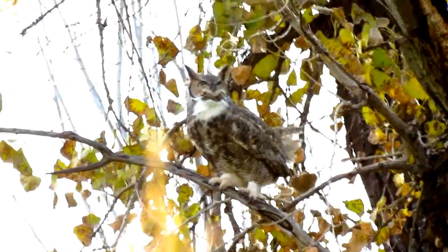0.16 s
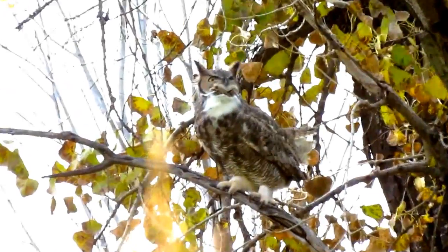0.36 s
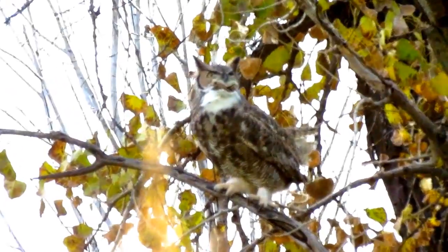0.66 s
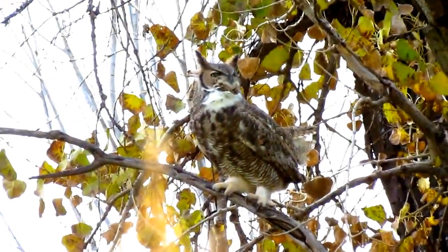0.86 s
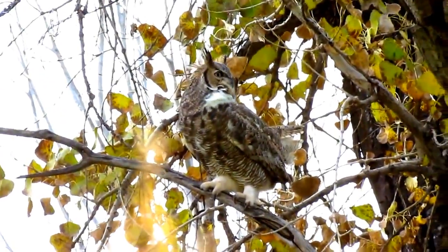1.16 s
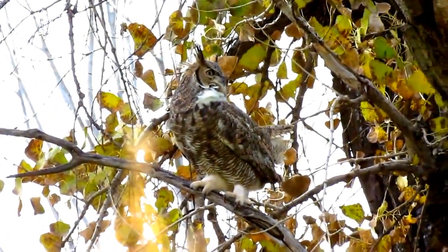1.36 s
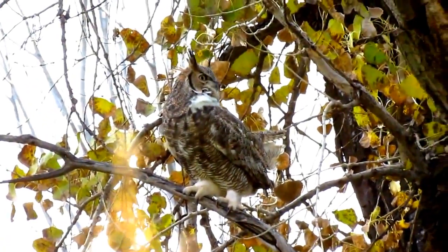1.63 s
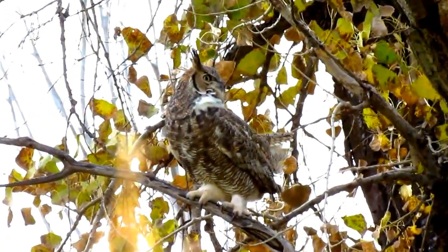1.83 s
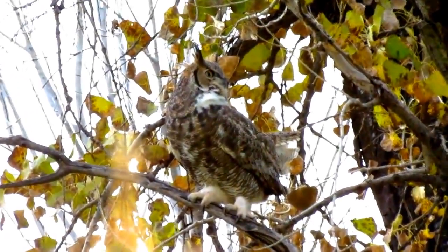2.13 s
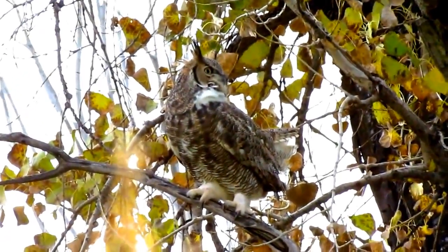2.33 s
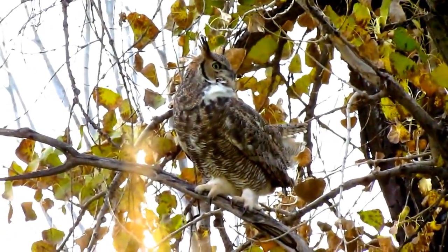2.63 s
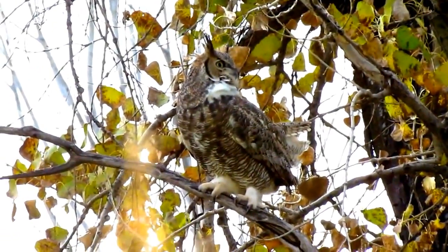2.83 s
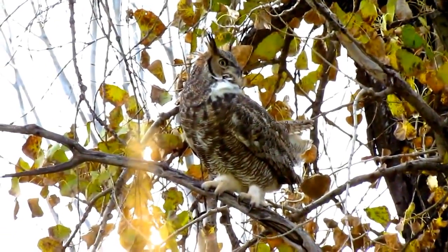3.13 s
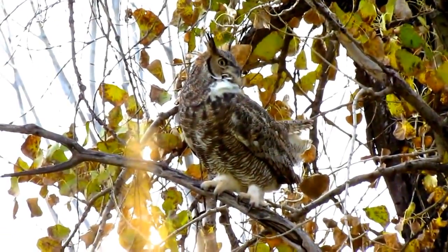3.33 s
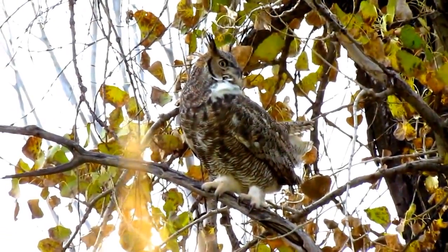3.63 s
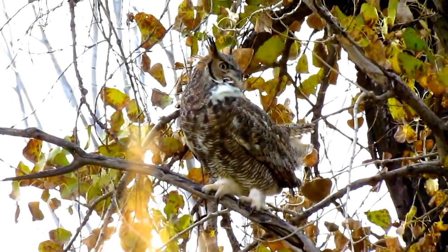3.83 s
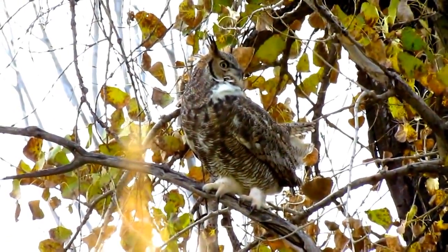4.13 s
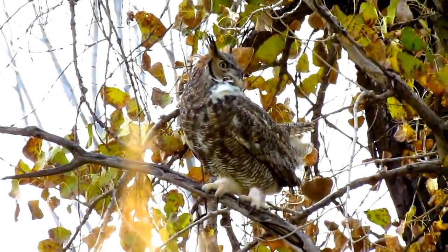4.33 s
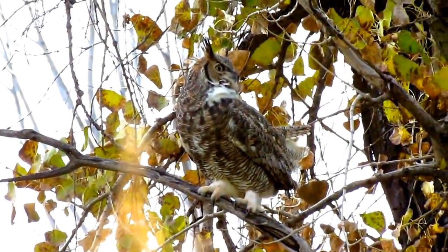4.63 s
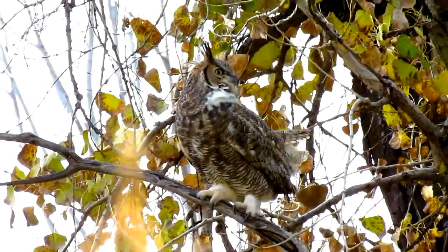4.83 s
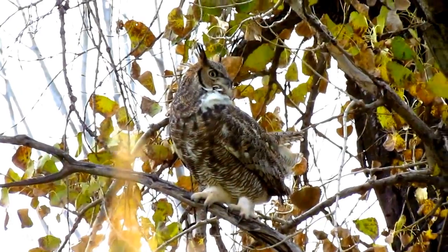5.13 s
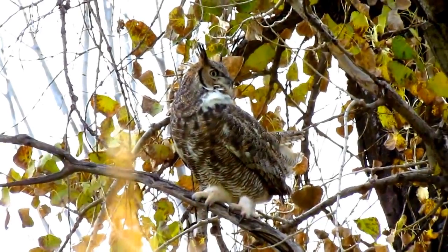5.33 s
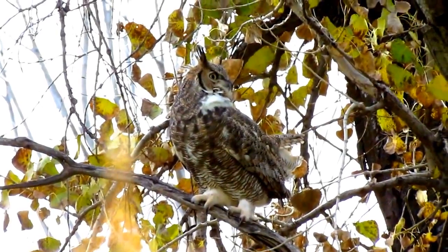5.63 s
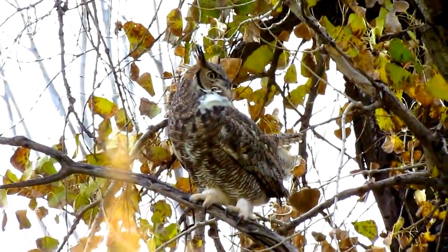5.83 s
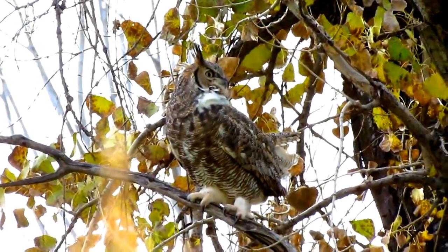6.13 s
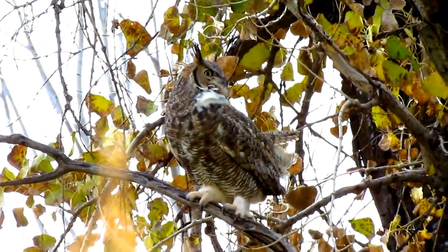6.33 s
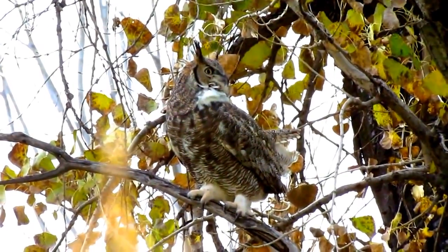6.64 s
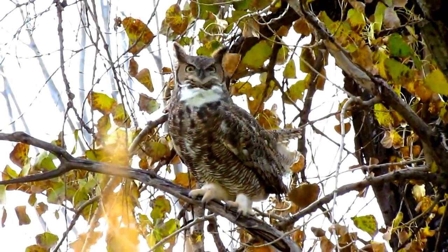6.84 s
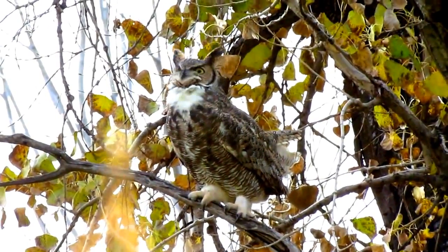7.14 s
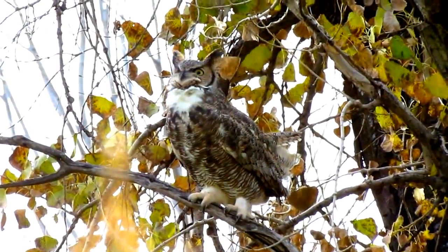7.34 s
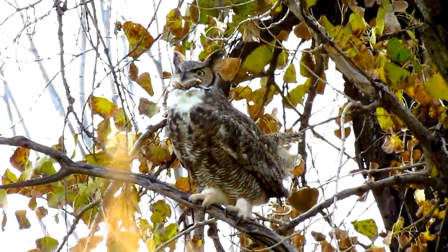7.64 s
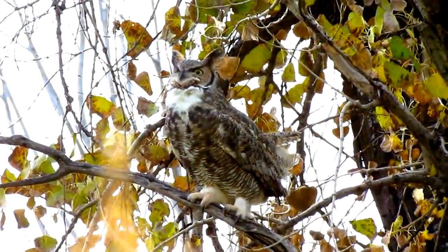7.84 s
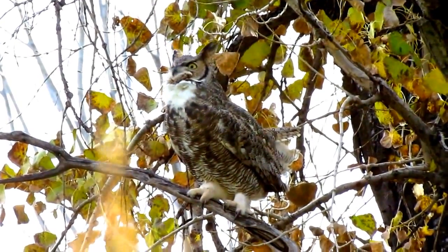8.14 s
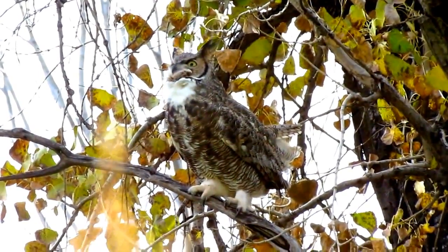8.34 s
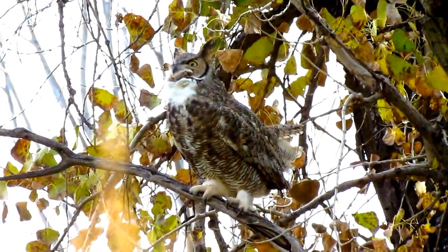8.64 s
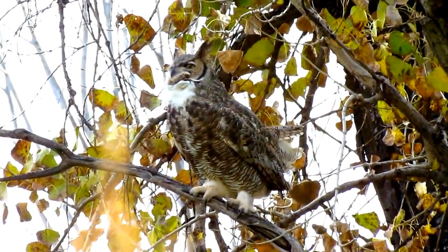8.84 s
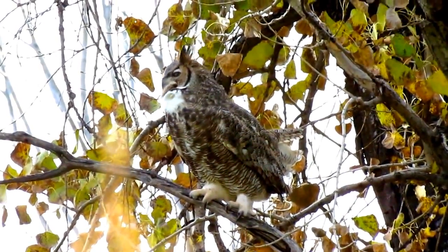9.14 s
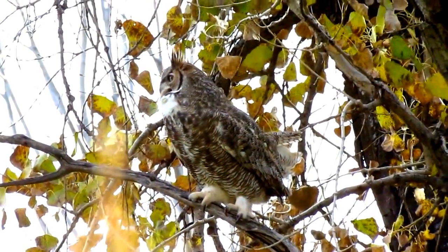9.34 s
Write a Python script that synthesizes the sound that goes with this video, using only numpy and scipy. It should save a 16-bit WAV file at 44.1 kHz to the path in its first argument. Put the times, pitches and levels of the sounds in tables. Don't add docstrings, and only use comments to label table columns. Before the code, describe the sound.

A sparrow chirps scoldingly on the left over distant traffic drone and pulsing crickets, with loud camera-handling clicks in the first two seconds.

```python
import sys
import numpy as np
from scipy import signal
from scipy.fft import rfft, irfft, next_fast_len
from scipy.io import wavfile
from scipy.ndimage import uniform_filter1d, minimum_filter1d, map_coordinates

SR = 44100
rng = np.random.default_rng(int(sys.argv[2]) if len(sys.argv) > 2 else 0)


def field_ratio(decibels):
    return 10 ** (np.asarray(decibels, dtype=float) / 20)


def master_out(mix):
    frames = np.transpose(np.atleast_2d(mix))
    ceiling = np.clip(frames, -1, 1)
    pcm = np.round(ceiling * 32767).astype(np.int16)
    wavfile.write(sys.argv[1], SR, pcm)


N = 418068
CLOCK = np.arange(N) / SR


def unit(x):
    return x / np.sqrt(np.mean(x ** 2) + 1e-20)


def along(points, hz):
    f, v = np.transpose(points)
    return np.interp(np.log(hz + 1), np.log(f + 1), v)


def curves(rows, silence_db=-120):
    s, *cols = np.transpose(rows)
    out = [np.interp(CLOCK, s, c) for c in cols]
    out[-1][(CLOCK < s[0]) | (CLOCK > s[-1] + .01)] = silence_db
    return out


def wobble(rate):
    coarse_s = CLOCK[::16]
    knots = rng.standard_normal(int(N * rate / SR) + 4)
    return np.interp(CLOCK, coarse_s, map_coordinates(knots, [coarse_s * rate]))


def hold(t, length, rise, fall):
    return np.clip(np.minimum(t / rise, (length - t) / fall), 0, 1)


def panned(x, lr_db):
    return x * field_ratio(np.array([[lr_db / 2], [-lr_db / 2]]))


def tone(hz):
    return np.sin(2 * np.pi * np.cumsum(hz) / SR)


def rush(spectrum, alike, patchy_db):
    z = signal.stft(rng.standard_normal((2, N)), nperseg=512)[2]
    field = uniform_filter1d(rng.standard_normal(z.shape[1:]), size=5, axis=0)
    field = uniform_filter1d(field, size=12, axis=1)
    pair = signal.istft(z * field_ratio(patchy_db * unit(field)), nperseg=512)[1][:, :N]
    m = next_fast_len(N + 8192)
    hz = np.fft.rfftfreq(m, 1 / SR)
    turn = np.arccos(np.clip(along(alike, hz), -1, 1)) / 2
    coloured = rfft(pair, m) * field_ratio(along(spectrum, hz)) * [np.cos(turn), np.sin(turn)]
    mid, side = irfft(coloured, m)[:, :N]
    return unit(np.array([mid + side, mid - side]))


def add(track, sound, s):
    i = round(s * SR)
    part = sound[..., max(-i, 0):max(N - i, 0)]
    track[..., max(i, 0):max(i, 0) + part.shape[-1]] += part


def among_trees(call, wet_db, lr_db, wall_db):
    # pitch_hz, time to fade by 60 dB_s
    trunk_fade = [(1500, .6), (3800, .7), (7000, .35)]
    hz, t, z = signal.stft(rng.standard_normal((2, SR // 2)), SR, nperseg=256)
    clumps_db = 4 * rng.standard_normal((2, 1, len(t)))
    fade_db = 60 * t / along(trunk_fade, hz)[:, None]
    tail = signal.istft(z * field_ratio(clumps_db - fade_db), SR, nperseg=256)[1]
    tail = tail / np.sqrt(np.sum(tail ** 2) / 2)
    delayed = np.pad(call, (SR // 200, 0))[None]
    wet = field_ratio(wet_db) * signal.fftconvolve(delayed, tail, axes=1)
    add(wet, panned(call, lr_db), 0)
    add(wet, panned(field_ratio(wall_db) * call, lr_db=10.0), .043)
    return wet


def traffic():
    # time_s, level_db
    road = [
        (0.0, -43.5),
        (1.37, -45),
        (3.64, -44),
        (4.86, -44.5),
        (7.68, -43.5),
        (8.16, -42.5),
        (9.48, -43),
    ]
    # pitch_hz, level_db per Hz
    rumble_colour = [(8.8, -33.5), (15, -4.5), (64, -1.5), (113, -4), (151, -8), (188, -7.5), (269, -10.5),
                     (292, -9.5), (400, -16), (520, -22.5), (880, -120)]
    # pitch_hz, level_db per Hz
    tyre_colour = [(150, -28), (250, -3), (400, -4.5), (500, -2.5), (790, 0.5), (1020, -.5), (1300, -8.5),
                   (1650, -16), (2500, -30.5), (4000, -78.5)]
    # pitch_hz, level_db per Hz
    leaf_colour = [(1200, -30), (1800, -4), (2500, 0), (3200, -1), (4000, -3), (5000, -5), (6300, -8),
                   (8000, -10), (10000, -12.5), (13000, -15.5), (15800, -19)]
    # pitch_hz, likeness (1 = same)
    likeness = [(60, 0.96), (130, 0.89), (290, 0.9), (640, 0.8), (1410, 0.425), (3100, 0), (6820, 0.14),
                (15000, 0)]
    # start_s, length_s, level_db
    pulls = [
        (-.1, 2.44, -49),
        (2.2, .8, -47),
        (3.75, 1.06, -51),
        (4.752, 0.93, -45),
        (5.85, 0.68, -44.5),
        (6.8, 1.22, -53),
        (8.2, 0.78, -51),
        (9, 0.77, -52),
    ]
    flow_db, = curves(road)
    flow_db = flow_db - flow_db.mean()
    rumble = panned(rush(rumble_colour, likeness, patchy_db=-0.15), lr_db=-1.3)
    rumble *= field_ratio(-43 + 0.96 * flow_db + 0.43 * wobble(4.5))
    tyres = panned(rush(tyre_colour, likeness, patchy_db=0.23), lr_db=0.7)
    tyres *= field_ratio(-42.5 + flow_db + 0.34 * wobble(6))
    leaves = panned(rush(leaf_colour, likeness, patchy_db=-0.2), lr_db=0.0)
    leaves *= field_ratio(-58.5 + 0.14 * flow_db + 0.5 * wobble(11))
    idle_db, firing_hz = -60, 73
    pull = field_ratio(idle_db)
    for s, length, db in pulls:
        pull = pull + field_ratio(db) * hold(CLOCK - s, length, rise=0.14, fall=0.19)
    engine = pull * field_ratio(.7 + 2 * wobble(4.2)) * tone(firing_hz + 1.81 * wobble(7))
    return rumble + tyres + leaves + engine


def crickets():
    # wing pitch_hz, level_db, strokes per second
    chorus = [
        (2050, -2, 35.6),
        (2090, 0, 36.2),
        (2130, -1, 36.7),
        (2185, -5, 37.3),
        (2010, -6, 47),
    ]
    out = np.zeros((2, N))
    for hz, db, rate in chorus:
        stroke = np.maximum(tone(rate + .3 * wobble(1.5)) + 1.3, 0)
        path = field_ratio(db + 3 * np.array([wobble(22), wobble(22)]))
        cycles = np.cumsum(hz + 32 * wobble(18)) / SR + rng.random((2, 1))
        out += path * stroke * np.sin(2 * np.pi * cycles)
    start_s, every_s, trill_s, edge_s = .3, .745, .46, .08
    trill = hold((CLOCK - start_s) % every_s, trill_s, edge_s, edge_s)
    trill_db, pause_db = -59, -4.6
    return field_ratio(trill_db + pause_db * (1.5 - trill)) * unit(out)


def katydid():
    # time before its end_s, level_db
    strokes = [
        (.088, -12),
        (.071, -9),
        (.054, -5),
        (.037, -3),
        (.02, -.5),
        (0, -.8),
        (-.025, -8),
    ]
    # pitch_hz, level_db per Hz
    rasp_colour = [(2500, -30), (4000, -9), (7000, -4), (10000, -3), (13000, 0), (15800, -3)]
    gate = np.zeros(N)
    t = np.arange(SR // 50) / SR
    stroke = t / .0025 * np.exp(1 - t / .0025)
    first_end_s, every_s, first_db, swell_db = 7.553, .1941, -63.5, 1.12
    for k in range(11):
        for before_s, share_db in strokes:
            db = first_db + swell_db * k + share_db + rng.normal(0, 1.2)
            add(gate, field_ratio(db) * stroke, first_end_s + every_s * k - before_s - .002)
    return gate * rush(rasp_colour, [(5000, .6)], patchy_db=1.5)


def other_birds():
    # start_s, length_s, from_hz, to_hz, level_db, left-right_db
    seeps = [
        (.757, 0.0143, 8700, 8000, -64, -4),
        (2.212, .014, 8620, 8100, -68, 8),
        (5.611, 0.049, 6400, 7500, -62, 7.5),
        (5.612, 0.0364, 5900, 6650, -60.5, 3.5),
        (6.254, .006, 5300, 4200, -60, 19.5),
        (6.462, .045, 5930, 6900, -65, 0),
    ]
    # time_s, pitch_hz, level_db
    whistle = [
        (9.0, 3230, -84),
        (9.07, 3350, -68),
        (9.2, 3620, -65.5),
        (9.27, 4000, -63),
        (9.36, 4370, -59.5),
        (9.41, 4340, -61),
        (9.48, 4050, -72),
    ]
    out = np.zeros((2, N))
    for s, length, from_hz, to_hz, db, lr_db in seeps:
        u = np.linspace(0, 1, round(length * SR))
        quiver_hz = 70 * np.interp(u, np.linspace(0, 1, num=12), rng.standard_normal(12))
        glide_hz = from_hz + (to_hz - from_hz) * np.sin(np.pi / 2 * u)
        call = np.sin(np.pi * u) ** 0.48 * tone(glide_hz + quiver_hz)
        add(out, among_trees(field_ratio(db + 5.0) * call, wet_db=-2, lr_db=lr_db, wall_db=-21.5), s)
    hz, db = curves(whistle)
    for port in out:
        hoarse = field_ratio(3 * wobble(30)) * wobble(700)
        strand = field_ratio(-5 - 90 * np.abs(CLOCK - 9.21)) * wobble(150) * tone(np.full(N, 4950.))
        port += field_ratio(db + 5.5) * (hoarse * tone(hz) + strand)
    return out


def zoom_drive():
    # start_s, length_s, spin-up_s, level_db
    runs = [
        (.14, .4, .018, -59.5),
        (1.72, .305, .11, -60.5),
    ]
    # pitch_hz, level_db per Hz
    drive_colour = [(1100, -30), (1800, -3), (4000, -2), (6000, -3), (7500, -4), (8900, -.5), (9800, -4),
                    (11300, 0), (13700, -6), (14200, -15), (15800, -22)]
    level = sum(field_ratio(db) * hold(CLOCK - s, length, rise, fall=0.022) for s, length, rise, db in runs)
    grit = field_ratio(6.0 + 0.56 * wobble(40.5) + 1.6 * wobble(250))
    return level * grit * panned(rush(drive_colour, [(5000, 0.19)], patchy_db=-1.0), lr_db=1.0)


def scrapes():
    # start_s, length_s, level_db, upper end of the noise band_hz
    slips = [
        (0.048, 0.0093, -31, 5200),
        (0.526, 0.0089, -40.5, 9000),
        (1.344, 0.011, -37.5, 9000),
        (1.385, .008, -38, 7000),
        (1.401, 0.003, -34, 5000),
    ]
    out = np.zeros((2, N))
    for s, length, db, upper_hz in slips:
        n = round(length * SR)
        edges_hz = [upper_hz * 0.26, min(upper_hz * 0.95, SR / 2.2)]
        band = signal.butter(1, edges_hz, "bandpass", fs=SR)
        swell = np.sin(np.linspace(0, np.pi, n)) ** .5
        add(out, field_ratio(db) * swell * signal.lfilter(*band, rng.standard_normal((2, n))), s)
    return out


def contacts(events, modes, gain_db, colour_db, rise_s, apart):
    out, t = np.zeros((2, N)), np.arange(SR // 12) / SR
    hz, level, t60 = np.transpose(modes)[:, :, None]
    band = np.digitize(hz, [1200, 3000, 6000])
    side = np.array([1, -1])[:, None, None]
    for s, db, lr_db, *touch in events:
        weight_db, edge_db = touch or (0, 0)
        low_db, mid_db, high_db = np.add(colour_db, [weight_db, edge_db, edge_db])
        colour = np.array([low_db, 0, mid_db, high_db])[band]
        phase = np.pi * np.arange(len(hz))[:, None] + apart * (hz / 1000) ** 0.19 * side
        fade = field_ratio(level + colour - 60 * t / t60)
        ring = np.sum(fade * np.sin(2 * np.pi * hz * t + phase), axis=1)
        noise = uniform_filter1d(rng.standard_normal((2, len(t))), size=3)
        crack = field_ratio(high_db - 12.5 - 60 * t / 0.0095) * noise
        onset = 1 - np.exp(-(t / rise_s) ** 2)
        add(out, panned(field_ratio(db + gain_db) * onset * (ring + crack), lr_db), s)
    return out


def lever_snaps():
    # time_s, peak_db, left-right_db, weight_db, edge_db
    snaps = [
        (1.9465, -8, -6, 0, 0),
        (2.0062, -24.4, -3.4, 10.1, -6.1),
    ]
    # pitch_hz, level_db, time to fade by 60 dB_s
    lever = [(577, -23.5, 0.043), (798, -25, 0.05), (1560, -2, 0.018), (2120, -17, 0.044),
             (2347, -7.5, 0.011), (3160, -21, 0.0234), (3900, -5.5, 0.013), (6150, -10, 0.0061),
             (9200, -18, 0.006), (4480, -10, .009), (5340, -12, 0.0065), (6800, -12, 0.00645),
             (10070, -19, .008), (12300, -9, 0.002)]
    return contacts(snaps, lever, gain_db=3.0, colour_db=(5.5, .5, 3), rise_s=0.00019, apart=0.61)


def catch_clack():
    # time_s, peak_db, left-right_db
    clacks = [
        (.6583, -7.5, -8),
    ]
    # pitch_hz, level_db, time to fade by 60 dB_s
    catch = [(776, -21, 0.063), (1180, -15, 0.021), (1670, -5, 0.019), (2300, -10, 0.0108),
             (2750, -13, 0.0137), (3920, -8.5, 0.014), (4364, -13, 0.011), (5540, -6, 0.0075),
             (6920, -8.5, 0.0064), (9370, -9.5, 0.0057), (12270, -12.5, 0.00665), (13560, -33.5, .006)]
    return contacts(clacks, catch, gain_db=3, colour_db=(4, -1, -2), rise_s=0.00019, apart=0.59)


def pawl_slip():
    # time_s, peak_db, left-right_db
    notch = [
        (1.4181, -17, -2),
    ]
    # pitch_hz, level_db, time to fade by 60 dB_s
    pawl = [(702, -15, 0.038), (1482, -2, 0.015), (2240, -8, 0.027), (3430, -6, 0.015), (4000, -1, 0.0081),
            (5470, -8, 0.0088), (6340, -9, 0.0053), (8840, -25, .012), (10900, -22, .012)]
    return contacts(notch, pawl, gain_db=-2.5, colour_db=(1.3, 3, 4), rise_s=0.00028, apart=0.49)


def grip_taps():
    # time_s, peak_db, left-right_db, weight_db, edge_db
    taps = [
        (0.1721, -35.9, -10.4, -1.1, 3.1),
        (0.4969, -35.5, -3.4, -2.1, -9.1),
        (0.5323, -24.6, -1.4, 0.1, 0.1),
    ]
    # pitch_hz, level_db, time to fade by 60 dB_s
    grip = [(934, -3.5, 0.053), (1520, -5, 0.03), (2020, -3.5, 0.015), (2840, -12.5, 0.016),
            (3650, -8, 0.015), (5300, -23, .008), (11500, -26, 0.0116)]
    return contacts(taps, grip, gain_db=2.0, colour_db=(1.5, 1.5, 1.65), rise_s=0.00043, apart=0.42)


def shell_bumps():
    # time_s, peak_db, left-right_db
    thuds = [
        (0.7621, -39.1, -1.4),
        (1.7121, -44.1, -1.4),
        (2.2141, -42.6, -1.4),
        (2.2281, -43.1, -1.4),
    ]
    # time_s, peak_db, left-right_db, weight_db, edge_db
    knocks = [
        (0.0229, -32.1, -2.4, 8.4, 4.1),
        (1.693, -24.1, 1.1, 0.1, 0.1),
    ]
    # pitch_hz, level_db, time to fade by 60 dB_s
    shell = [(595, -1.5, 0.075), (930, -0.5, 0.0464), (1514, 3.5, 0.02), (2001, 1.5, 0.019),
             (2830, -10, 0.017), (3570, -11, 0.0071), (5250, -17.5, 0.0149), (7600, -15, 0.0069),
             (11200, -23, 0.00565)]
    soft = contacts(thuds, shell, gain_db=5.0, colour_db=(3.2, -12, -20), rise_s=0.0045, apart=0.2)
    hard = contacts(knocks, shell, gain_db=4.5, colour_db=(-8.5, -2.5, 7.5), rise_s=0.00023, apart=0.53)
    return soft + hard


def cap_ticks():
    # time_s, peak_db, left-right_db
    ticks = [
        (1.1503, -40.1, -3.1),
        (1.7579, -51.4, 1.1),
        (1.8016, -36.1, -6.1),
        (3.4519, -41.4, 0.1),
        (3.8169, -21.6, -7.4),
        (4.161, -41.9, -4.1),
        (4.8141, -39.9, -2.1),
        (4.8408, -37.9, -4.1),
        (6.1939, -39.1, 0.6),
    ]
    # pitch_hz, level_db, time to fade by 60 dB_s
    cap = [(1470, -3.5, 0.0084), (2300, -7, 0.01), (3170, 2.5, 0.0072), (4580, -9.5, 0.0099),
           (5430, 3, 0.0032), (7670, -18, 0.0063), (12900, -34, .006)]
    return contacts(ticks, cap, gain_db=0.5, colour_db=(1.5, 1.5, 1.5), rise_s=0.0002, apart=0.89)


def sparrow():
    # start_s, level_db, top of the second partial_hz, third partial_db, length_s
    chirps = [(-.06, -55, 4000, -10, 0.075), (0.597, -53.5, 4000, -5, 0.067), (1.312, -55, 4000, -2, .08),
              (1.925, -50.5, 4070, -8.5, 0.063), (2.769, -59, 3940, -2, 0.1), (3.806, -54, 4040, -8, 0.078),
              (4.551, -54.5, 4042, -3, 0.086), (5.144, -54.5, 4030, -2.5, .08),
              (6.075, -56.5, 4000, -6.5, 0.0832), (6.847, -54.5, 4050, -4, 0.0806),
              (7.389, -54, 3646, -4, .082)]
    arch = [(0, .69), (.3, .85), (.45, .98), (.57, 1), (.7, .9), (1, .77)]
    # pitch_hz, level_db
    throat = [(1400, -11), (1900, -11.5), (2700, -9), (3700, 0), (4100, -5.5), (4500, -2.5), (5200, 2.5),
              (5700, -12.5), (6400, -5.5), (7200, -33)]
    breath_band = signal.butter(2, (3880, 7200), "bandpass", fs=SR)
    out = np.zeros((2, N))
    for s, db, top_hz, third_db, length in chirps:
        u = np.linspace(0, 1, round(length * SR))
        quiver = 1 + .02 * np.interp(u, np.linspace(0, 1, num=30), rng.standard_normal(30))
        hoarse = 1 + .45 * np.interp(u, np.linspace(0, 1, num=60), rng.standard_normal(60))
        pitch = uniform_filter1d(np.interp(u, *np.transpose(arch)), size=250) * quiver * top_hz / 2
        late = -12 * u
        partials = [(1, -.5), (2, 0.023), (3, third_db + late), (4, -.5 + 1.4 * late)]
        call = sum(field_ratio(level_db + along(throat, k * pitch)) * tone(k * pitch) for k, level_db in partials)
        scratch = signal.lfilter(*breath_band, rng.standard_normal(len(u)))
        call += field_ratio(-12.5 + 2 * late) * unit(scratch)
        shape = np.sin(np.pi * u) ** 0.5 * hold(u - .05, length=1, rise=0.063, fall=.01)
        chirp = field_ratio(db + 4.5) * shape * hoarse * call
        add(out, among_trees(chirp, wet_db=4.5, lr_db=14.0, wall_db=-6.5), s)
    return out


def scene():
    background = traffic() + crickets() + katydid() + other_birds()
    hand = zoom_drive() + scrapes() + lever_snaps() + catch_clack() + pawl_slip()
    hand += grip_taps() + shell_bumps() + cap_ticks()
    return background + hand + sparrow()


def roll_off(x):
    return signal.sosfilt(signal.butter(12, 16470, fs=SR, output="sos"), x)


def record(dry):
    over_db = np.maximum(20 * np.log10(np.abs(dry).max(axis=0) + 1e-9) + 14, 0)
    held = -minimum_filter1d(-over_db, size=440, origin=219)
    keep = np.exp(-1 / (.12 * SR))
    duck_db = signal.lfilter([1 - keep], [1, -keep], held)
    clipped = np.clip(dry * field_ratio(-3 * duck_db), -1, 1)
    m = next_fast_len(N)
    top_hz = 15830
    limited = irfft(rfft(clipped, m) * (np.fft.rfftfreq(m, 1 / SR) < top_hz), m)[:, :N]
    return roll_off(limited)


dry = scene()
out = record(dry)
master_out(out)
```